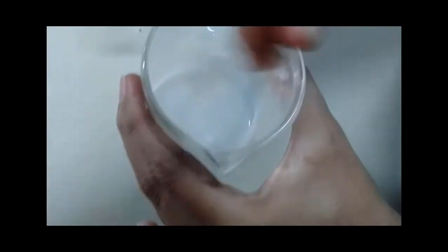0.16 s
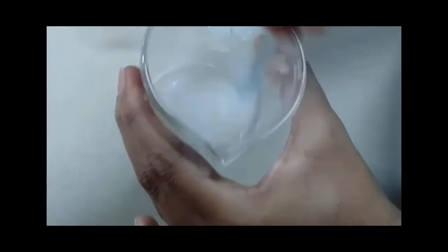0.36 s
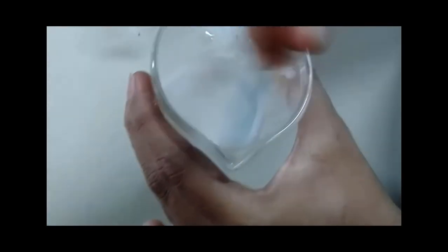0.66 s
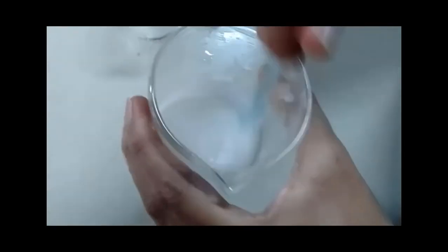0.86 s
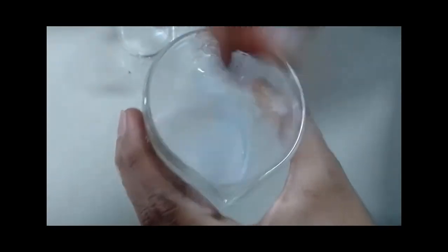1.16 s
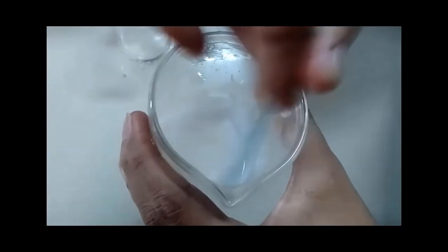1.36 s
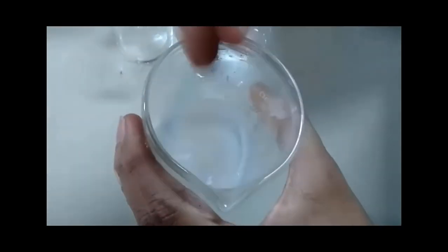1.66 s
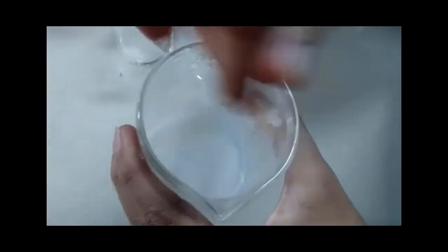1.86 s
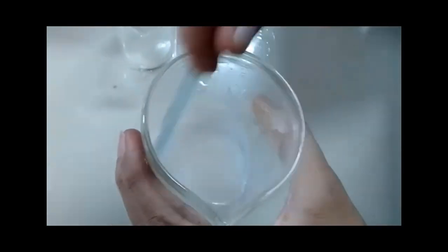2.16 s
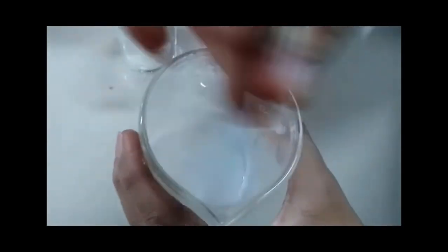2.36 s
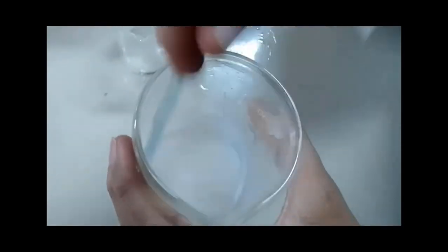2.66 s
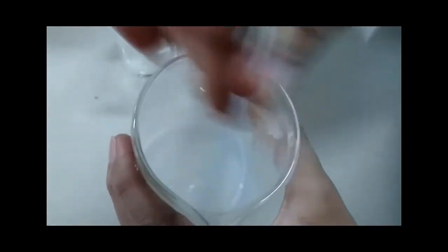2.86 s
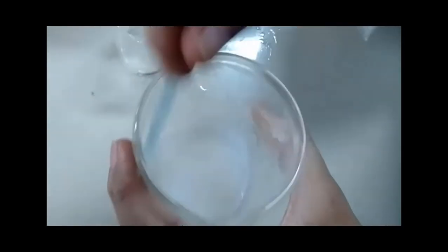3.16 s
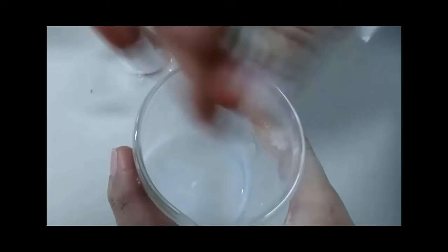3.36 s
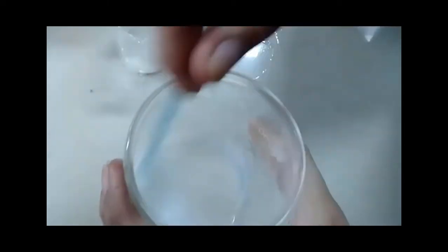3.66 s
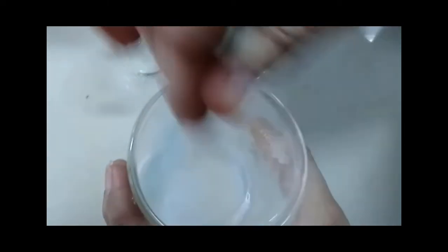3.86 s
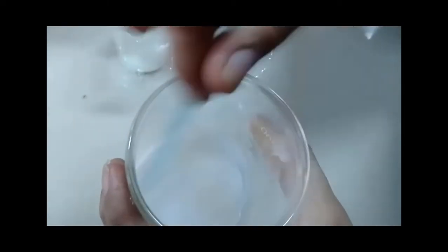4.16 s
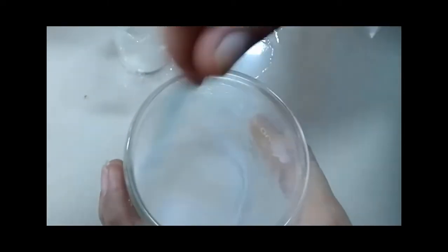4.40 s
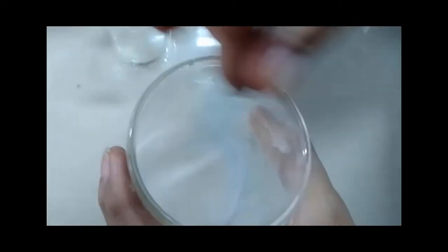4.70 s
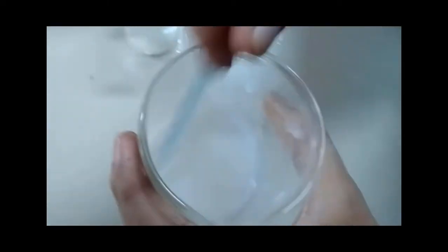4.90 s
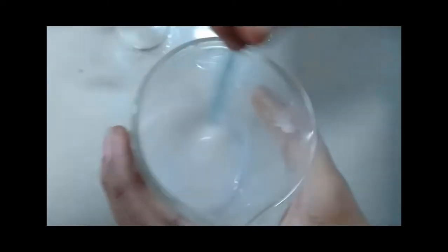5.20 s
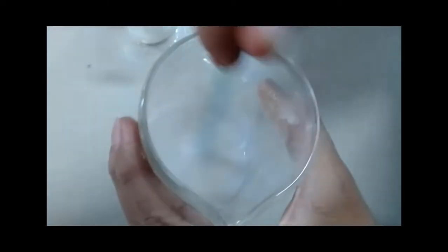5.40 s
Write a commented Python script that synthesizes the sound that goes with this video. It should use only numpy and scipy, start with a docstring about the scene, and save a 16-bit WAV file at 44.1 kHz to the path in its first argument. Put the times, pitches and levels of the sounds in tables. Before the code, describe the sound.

Someone stirs a creamy liquid hard with a glass rod in a hand-held glass beaker, heard very close in stereo. From 0 s the rod slides loudly on the wall and begins clinking, then strikes continuously, irregularly, roughly fifteen to twenty times a second. Each clink is a short chattery tick with a mid-high glassy tone, bright rod rattle and sometimes a hollow cup-like knock; liquid and hand stop it ringing. Harder hits stand out near 0.7, 1.2, 1.55, 2.85, 3.6, 3.85 and 4.3 s. Between hits there is a wet gritty hiss and scraping, with tiny squeaky rubs around 1.5, 1.7, 3.4, 4.6 and 5.2 to 5.4 s. Clusters of glancing taps alternate with fuller knocks. Soft low bumps come through the hand, clearest at 0.7 s. After about 5.2 s hits thin out into rubbing. The room is quiet, with faint hum and very short reflections.

```python
"""A glass rod is whipped round a hand-held glass beaker of creamy liquid, close to a two-port microphone.
Each blow is a chattering contact force that excites the decaying modes of cavity, wall, rim, base and rod.
Between blows the tip slides: tiny slips excite the glass under a friction hiss, and longer rubs squeak.
Jolts reach the microphone through the hand as low pushes; the room hums faintly as shaped noise."""
import sys
import numpy as np
from scipy import signal
from scipy.io import wavfile
from scipy.ndimage import uniform_filter1d

SR = 44100
rng = np.random.default_rng(int(sys.argv[2]) if len(sys.argv) > 2 else 0)


def generate_wav(sig):
    """Save sig (samples, or channels by samples) to the path in sys.argv[1] as 16-bit PCM at SR."""
    pcm = np.round(np.clip(np.atleast_2d(sig).T, -1, 1) * 32767).astype(np.int16)
    wavfile.write(sys.argv[1], SR, pcm)


N = 244314  # samples


def gain_of(db):
    """Level definition: decibels to amplitude ratio."""
    return 10 ** (np.asarray(db) / 20)


def summed_db(*db):
    """Energy addition: the level of several incoherent sounds together."""
    return 10 * np.log10(np.sum(gain_of(db) ** 2))


def evened(x):
    """Normalization to an rms of 1."""
    return x / np.sqrt(np.mean(x ** 2) + 1e-20)


def read(points, hz):
    """Linear interpolation of a table on a log-frequency axis."""
    f, value = np.transpose(points)
    return np.interp(np.log(hz + 1), np.log(f + 1), value)


def add(mix, s, sound):
    """Superposition: adds a stereo sound to the mix at time s."""
    part = mix[:, round(s * SR):][:, :sound.shape[1]]
    part += sound[:, :part.shape[1]]


def wavering(step_s, depth_db):
    """Random modulation: a gain that drifts from step to step."""
    levels = np.interp(np.arange(N) / SR / step_s, np.arange(2000), rng.standard_normal(2000))
    return gain_of(depth_db * levels)


# Phase between the ports: pitch_hz, left_lead_rad
PORT_LEAD = [(0, 0), (860, 0.71), (2500, 6.5), (5170, 8), (7150, -1.5), (8700, -16), (10800, -18.5),
             (15100, -32.5)]
# Balance between the ports: pitch_hz, left_minus_right_db
PORT_BALANCE = [(60, 9), (150, 1), (380, 10), (940, -14.5), (2370, 0.5), (5930, -3), (14900, 11.5)]


def ports(hz, scatter):
    """Level and phase differences: complex gains of two ports, with an extra left lead (rad)."""
    half = gain_of(read(PORT_BALANCE, hz) / 2) * np.exp(.5j * (read(PORT_LEAD, hz) + scatter))
    return np.array([half, 1 / half])


# Likeness of the noise at the two ports: pitch_hz, correlation (no unit, limited to 0..1 when read)
PORT_LIKENESS = [(60, -0.0014), (180, 0.78), (540, 0.038), (1640, 0.97), (4930, 0.35), (14900, -1.4)]


def wash(spectrum, size, patchy_db):
    """Partially coherent noise: random spectra, shaped and patchy, overlap-added at an rms of 1."""
    hz = np.fft.rfftfreq(size, 1 / SR)
    frames = N * 4 // size + 5
    a, b, c, d, patches = rng.standard_normal((frames, len(hz), 5)).T
    patches = uniform_filter1d(patches, size=6, axis=0)  # across frequency
    patches = evened(uniform_filter1d(patches, size=8, axis=1))  # across time
    same = np.clip(read(PORT_LIKENESS, hz), 0, 1)[:, None]
    left = a + 1j * b
    right = same * left + np.sqrt(1 - same ** 2) * (c + 1j * d)
    spectra = np.array([left, right]) * ports(hz, 0)[..., None]
    spectra *= gain_of(read(spectrum, hz)[:, None] + patchy_db * patches)
    return evened(signal.istft(spectra, nperseg=size, noverlap=size * 3 // 4)[1][:, :N])


# Relative spectrum of the room hum: pitch_hz, density_db (per Hz)
ROOM_SPECTRUM = [(15, -55), (25, -27), (228, -8.5), (393, -12.5), (676, -21), (800, -18), (1210, -35),
                 (1760, 0), (1970, -13.5), (2200, -21.5), (2860, -47), (4840, -120)]


def room():
    """Stationary background: faint shaped noise, stronger at the left port."""
    level_db = -54.5 + np.array([[4.0], [-4.0]])
    return gain_of(level_db) * wash(ROOM_SPECTRUM, size=1024, patchy_db=3.0)


# Jolts through the hand: start_s, level_db (relative)
JOLTS = [(0.207, -43), (0.715, -27.5), (0.927, -40), (1.169, -38.5), (1.437, -43.5), (1.89, -49),
         (2.107, -40), (2.255, -42), (2.596, -38), (3.117, -40.5), (4.05, -43), (4.24, -51), (4.324, -42),
         (4.832, -44), (5.056, -43.5)]


def thud(s, db):
    """Structure-borne impulse: a low push and rebound that reaches mostly the left port."""
    x = np.arange(2000) / SR / .0016
    push = x * (1 - x / 2.7) * np.exp(-x)
    return s - .002, gain_of(db + 18.5) * push * gain_of([[0.5], [-17.0]])


def bench(x):
    """Diffuse reflection: convolves with dense decaying echoes from bench and walls, different at each port."""
    t = np.arange(6000) / SR
    tail = rng.standard_normal((2, len(t))) * gain_of(-60 * t / 0.17) * (t > .002)
    return signal.oaconvolve(x, tail / np.linalg.norm(tail[0]), axes=1)[:, :N]


# Modes of the beaker in four groups (air cavity, wall, rim, base): pitch_hz (nominal), level_db (relative), t60_s
GLASS = [
    [(805, -6.5, 0.054), (872, 3, 0.019)],
    [(2400, -13.5, 0.032), (2500, 5.5, 0.033), (2620, -1, 0.014)],
    [(3351, -4.5, 0.04), (3505, -4, 0.078)],
    [(3910, -2, 0.0093), (4034, -3.5, 0.021), (4425, 3, 0.017), (4535, -7.5, 0.016)],
]
# Modes of the hand-damped rod: pitch_hz (nominal), level_db (relative), t60_s
ROD = [(5300, -10, .007), (6100, -8, .006), (6800, -4, .009), (7420, -2, .012), (8300, -5, .006),
       (9380, -2, .012), (10200, -1, .007), (11000, -2, .006), (12000, -4, .005), (13000, -6, .005),
       (13850, -4, .006)]


def modes():
    """Modal decomposition: columns of Hz, dB, t60 and the part (0 cavity, 1 wall, 2 rim, 3 base, 4 rod)."""
    parts = GLASS + [ROD]
    return *np.concatenate(parts).T, np.repeat(np.arange(len(parts)), [len(rows) for rows in parts])


DRAG_S = 0.036  # time constant


def drag(column):
    """Exponential relaxation: an envelope that each blow raises by the level in a column of BLOWS."""
    kicks = np.zeros(N)
    kicks[[round(row[0] * SR) for row in BLOWS]] = gain_of([row[column] for row in BLOWS])
    return signal.lfilter([1], [1, -np.exp(-1 / (DRAG_S * SR))], kicks)


# How well skidding rings wall, rim and base: level_db
SKID_DB = [-7.5, 1.5, -3]
# The sloshing liquid loads the wall unevenly, zone by zone: pitch_ratio
ZONE_TUNING = [0.92, 1, 1.1]
ZONE_S, ZONE_DB = .035, 6  # how fast and how far each zone and part comes and goes


def skids():
    """Random excitation of resonators: dense tiny slips ring now one wall zone, now another, rim or base."""
    hz, db, t60, part = modes()
    t, out = np.arange(4096) / SR, np.zeros((2, N))
    for k, tuning in [(1, ratio) for ratio in ZONE_TUNING] + [(2, 0.98), (3, 1)]:
        here = part == k
        f = hz[here] * tuning
        rings = np.exp(np.outer(2j * np.pi * f - np.log(1000) / t60[here], t))
        rings *= 1 - np.exp(-t / 0.00051)  # soft onset
        gains = gain_of(db[here] + SKID_DB[k - 1]) * ports(f, 2.3 * rng.standard_normal(len(f)))
        body = (gains @ rings).real
        slips = gain_of(1.5 * rng.exponential(1, N)) * rng.standard_normal(N)
        slips = wavering(ZONE_S, ZONE_DB) * slips
        out += signal.oaconvolve(slips[None], body, axes=1)[:, :N]
    return evened(out)


# Steady part of the sliding: start_s, wall_db (tip pressure on the wall), hiss_db (friction)
SLIDE = [(0.0, -32, -32), (0.29, -45, -47), (0.48, -38, -38), (1.45, -42, -39), (1.56, -34.5, -37.5),
         (2.11, -46, -42.5), (2.19, -42, -41.5), (2.75, -45, -40.5), (2.82, -54, -39), (3.05, -46, -39),
         (3.69, -35, -38), (4.07, -46.5, -39), (4.3, -43.5, -38.5), (4.47, -40.5, -37), (4.64, -39, -41.5),
         (5.0, -42.5, -40.5), (5.43, -36.5, -42.5), (5.54, -43.5, -43.5)]
# Relative spectrum of wet friction: pitch_hz, density_db (per Hz)
HISS_SPECTRUM = [(900, -48), (1300, -22.5), (1760, -6), (2200, -19), (3000, 1.5), (4500, 10.5), (5000, 2),
                 (6300, 1), (7300, 9), (9600, 3), (11200, 2.5), (12400, -11), (13900, -1.5), (14600, -54)]
DRAG_WALL_DB, DRAG_HISS_DB = -22.5, -26  # drag after a blow, relative to its wall and rod levels
GRIP_S, GRIP_DB = .03, 4  # the grip of the tip wavers


def slide():
    """Sliding friction: slips ring the beaker over a smooth wet hiss, both swelling after blows."""
    s, wall_db, hiss_db = np.transpose(SLIDE)
    clock = np.arange(N) / SR
    hiss = wash(HISS_SPECTRUM, size=256, patchy_db=1.5)
    wall = gain_of(np.interp(clock, s, wall_db)) + gain_of(DRAG_WALL_DB) * drag(column=3)
    rough = gain_of(np.interp(clock, s, hiss_db)) + gain_of(DRAG_HISS_DB) * drag(column=1)
    return wall * skids() + rough * wavering(GRIP_S, GRIP_DB) * hiss


# Squeaks of the tip (levels relative): start_s, wall_db, wall_pitch_hz, cavity_db, cavity_pitch_hz, length_s
RUBS = [(0.0044, -17, 2500, -36.5, 852, 0.027), (1.512, -23, 2500, -20, 827, 0.025),
        (1.708, -7.5, 2440, -23, 870, 0.018), (3.3812, -10.5, 2390, -68, 896, 0.023),
        (4.598, -16.5, 2440, -37, 787, 0.03), (5.1888, -10, 2586, -34, 805, 0.0177),
        (5.322, -24, 2620, -29, 805, 0.03), (5.365, -18.5, 2456, -21.5, 794, 0.038),
        (5.438, -27.5, 2320, -74, 826, 0.039)]


def rub(row, luck):
    """Stick-slip: irregular slips keep wall, air cavity and base ringing roughly for a moment."""
    s, wall_db, wall_hz, cavity_db, cavity_hz, length = row
    slips = luck[:round(length * SR)]
    slips = slips * signal.windows.tukey(len(slips), .15)
    voices = ((wall_hz, wall_db - 3.0, .022),  # Hz, dB, t60 s
              (cavity_hz, cavity_db - 10.0, .05),
              (GLASS[3][1][0], wall_db - 9.5, .015))  # the base sings along
    t, sound = np.arange(3000) / SR, 0
    for hz, db, t60 in voices:
        mode = np.exp((2j * np.pi * hz - np.log(1000) / t60) * t) * (1 - np.exp(-t / 0.0014))
        ring = signal.fftconvolve(slips, mode)
        sound = sound + gain_of(db) * (ports(np.array([hz]), 0) * ring / abs(ring).max()).real
    return s, sound


# Blows (levels relative): start_s, rod_db, cavity_db, wall_db, rim_db, wall_pitch_hz (before scatter)
# a square blow sounds the cavity, a glancing one hardly
BLOWS = [(0.11,-17,-33,-23,-42,2680),(0.1231,-8.5,-21.5,-22.5,-29,2500),(0.2112,-8.5,-70,-36,-21.5,2500),(.2513,-10,-70,-44,-39,2500),(0.3192,-12.5,-70,-37,-25,2660),(0.3576,-13,-60,-29.5,-50,2720),(0.3778,-18,-33,-29,-26,2610),(.4426,-9.5,-70,-27,-23.5,2860),(0.4902,-12.5,-45,-26,-29,2460),(0.519,-23.5,-26,-16,-43,2500),(0.6163,-9.5,-21.5,-23.5,-25,2585),(0.715,-3.5,-31,-24.5,-14.5,2620),(.756,-19,-70,-28,-33,2640),(0.855,-12,-22,-27,-20,2500),(0.926,-9,-66,-16,-34,2714),(0.9872,-17.5,-49,-25,-40,2400),
         (0.9962,-21,-60,-17.5,-45,2560),(1.0136,-18,-21,-11.5,-43,2474),(1.07,-17,-40,-25,-45,2720),(1.1008,-14,-17.5,-11.5,-27,2500),(1.1683,-5,-66,-25.5,-40,2800),(1.2241,-16.5,-68,-27,-53,2760),(1.235,-21,-70,-29,-49,2650),(1.3271,-9,-25.5,-33,-48,2590),(1.3367,-9.5,-23.5,-31,-28,2500),(1.414,-45,-56,-26.5,-40,2730),(1.4375,-5,-65,-27,-16.5,2740),(1.467,-10.5,-67,-38,-30,2560),(1.4738,-11.5,-60,-47,-42,2750),(1.4794,-29,-64,-52,-48,2730),(1.4867,-24,-60,-40,-43,2740),(1.5103,-17.5,-14.5,-15,-15,2480),(1.5531,-5.5,-30.5,-18.5,-16,3005),(1.651,-8.5,-48,-27,-24,2620),(1.7061,-22,-33,-16.5,-48,2455),(1.809,-9,-34,-30.5,-39,2480),(1.8865,-7.5,-35.5,-22,-37,2620),(1.932,-13.5,-70,-33.5,-42,2680),
         (2.008,-9.5,-70,-34,-25.5,2620),(2.0634,-16,-31,-29,-23.5,2620),(2.108,-6.5,-60,-24.5,-30,2830),(2.161,-12.5,-90,-25,-51,2524),(2.2563,-7.5,-42,-25.5,-40,2590),(2.271,-20.5,-70,-41,-43,2580),(2.285,-12,-19.5,-19.5,-19,2550),(2.367,-6,-70,-33,-16,2500),(2.4019,-12.5,-70,-57,-35,2500),(2.493,-11.5,-61,-40,-25,2410),(2.513,-13.5,-42,-39,-44,2640),(2.5297,-13.5,-19.5,-28,-23,2560),(2.598,-7.5,-53,-26.5,-27.5,2500),(2.6436,-10,-68,-50,-35,2440),(2.7269,-9.5,-58,-45,-30.5,2500),(2.7578,-15.5,-39,-33.5,-45,2500),(2.7823,-7.5,-23,-30,-20.5,2460),(2.8504,-3.5,-64,-32,-23,2860),(2.8876,-12.5,-67,-26,-28,2500),
         (3.029,-15.5,-47,-50,-30,2540),(3.04,-9.5,-20.5,-26,-25,2555),(3.117,-7,-67,-24.5,-33,2390),(3.132,-25,-70,-40,-37,2500),(3.1623,-12,-59,-33,-43,2390),(3.247,-10,-70,-33,-28,2500),(3.264,-17,-60,-32,-42,2600),(3.2712,-14,-25.5,-28,-25,2630),(3.3425,-17,-45,-51,-28,2500),(3.387,-12,-68,-13.5,-42,2417),(3.4883,-10.5,-85,-39,-37,2460),(3.5214,-9,-21.5,-24.5,-22,2490),(3.5881,-4,-43,-32,-36,2490),(3.6339,-15.5,-36,-21,-30,2500),(3.6514,-12.5,-18.5,-8,-17,2426),(3.75,-9.5,-32,-36,-32,2550),(3.7564,-13.5,-23.5,-22,-34,2500),(3.8476,-2.5,-34,-31.5,-18,2400),
         (4.003,-8.5,-22.5,-27,-22,2430),(4.0512,-9,-70,-29,-36,2640),(4.1126,-15.5,-70,-30,-30,2500),(4.2413,-9,-23,-20,-25,2525),(4.295,-33,-70,-33,-32,2600),(4.3246,-3,-41,-29.5,-21,2470),(4.368,-17,-70,-22,-34,2420),(4.433,-9.5,-85,-40,-27,2420),(4.4859,-13,-47,-38,-45,2620),(4.5031,-8,-21,-29,-22,2460),(4.562,-6,-56,-24,-28,2750),(4.596,-17,-57,-32,-26,2380),(4.6178,-24,-31,-23,-28,2580),(4.7338,-10,-15.5,-18.5,-26,2620),(4.8375,-5.5,-70,-32,-17,2540),(4.8665,-16,-70,-24.5,-52,2690),(4.8781,-11.5,-88,-56,-51,2660),(4.886,-29,-70,-45,-46,2550),(4.9784,-19,-46,-38,-53,2340),(4.9867,-19,-31,-28,-36,2620),
         (5.0601,-7,-70,-21,-27,2740),(5.1077,-16.5,-70,-28.5,-47,2520),(5.118,-17,-70,-43,-50,2470),(5.1936,-22.5,-28,-19,-29.5,2490),(5.3171,-8.5,-42,-21.5,-26,2640),(5.3776,-25.5,-31,-20,-48,2500)]
# Parts (cavity, wall, rim, base, rod): radiation_db, left_minus_right_db, pitch_scatter (ratio),
# contact_share (ratio), port_phase_scatter_rad
PARTS = [(-7.5, 7, 0.02, 1.88, 0.32), (3.5, -3.5, 0.011, 1.22, 1.64), (7, 4.5, 0.0048, 0.74, 0.8),
         (3.5, 3.5, 0.032, 0.71, 0.78), (5, -0.5, 0.036, 0.57, 2.26)]
# Scatter of the mode shares with the landing spot, per part: level_db
SPOT_DB = [3, 2, 2, 3, 3]
# the base rings with the rod, the wall, and most under square blows
BASE_FROM_ROD_DB, BASE_FROM_WALL_DB, BASE_FROM_CAVITY_DB = -10.5, -9, 9
# contact time at a rod level of 0 dB, its growth with rod level, and its random log spread
CONTACT_MS, CONTACT_MS_PER_DB, CONTACT_SCATTER = 1.91, 0.09, 0.33
KNOCK_DB, KNOCK_SLOPE = 26.5, 5.77  # broad knock, mostly on hard blows; slope in dB per dB
GLANCE_DB, RIM_TILT_DB = -45.5, 2  # below this cavity level a blow glances and favours the upper rim mode


def blow(row, luck):
    """Modal excitation by impact: a chattering contact rings every mode; the landing spot sets its share."""
    s, rod_db, cavity_db, wall_db, rim_db, wall_hz = row
    base_db = summed_db(BASE_FROM_ROD_DB + rod_db, BASE_FROM_WALL_DB + wall_db,
                        BASE_FROM_CAVITY_DB + cavity_db)
    part_db = np.array([cavity_db, wall_db, rim_db, base_db, rod_db])
    contact_ms = (CONTACT_MS + CONTACT_MS_PER_DB * rod_db) * np.exp(CONTACT_SCATTER * luck[79])
    hz, db, t60, part = modes()
    gain_db, pan_db, scatter, brief, spread = np.transpose(PARTS)[:, part]
    upper = np.sign(hz - hz[part == 2].mean())
    db = db + RIM_TILT_DB * (part == 2) * upper * (cavity_db < GLANCE_DB)
    tune, spot, side = luck[:3 * len(hz)].reshape(3, -1)
    hz = np.where(part == 1, hz * wall_hz / GLASS[1][1][0], hz)  # the liquid loads the wall
    hz = hz * (1 + scatter * tune)

    t = np.arange(3072) / SR
    turn = np.exp(2j * np.pi * np.outer(hz, t))
    u = np.outer(1000 / np.clip(contact_ms * brief, .2, 9), t[:1000])  # time in contact times
    chatter = luck[-1000:] * u * np.exp(-u ** 2)
    at_mode = abs((chatter / turn[:, :1000]).sum(1, keepdims=True))  # force spectrum at each mode
    chatter /= at_mode + 0.21 * np.linalg.norm(chatter, axis=1, keepdims=True)
    rings = turn * np.exp(-np.outer(np.log(1000) / t60, t)) * (1 - np.exp(-t / 0.00093))
    rings = np.fft.ifft(np.fft.fft(rings) * np.fft.fft(chatter, len(t)))
    share_db = db + gain_db + part_db[part] + np.array(SPOT_DB)[part] * spot
    share = gain_of(share_db + np.outer([.5, -.5], pan_db))
    sound = ((share * ports(hz, spread * side)) @ rings).real

    t, u = t[:899], u[:, :899]
    crack = u[-1] * np.exp(-u[-1] ** 2)  # broad crack of glass on glass
    bounces = gain_of(5.8 * np.interp(t, np.arange(20) / 1000, luck[80:100]))  # ragged micro-contacts
    rattle = gain_of(-6.0) * bounces * (1 - np.exp(-t / 0.0024)) * np.exp(-(t / 0.0066) ** 2)
    snap = np.diff(luck[100:1900].reshape(2, 900), axis=1) * (crack + rattle)
    sound[:, :899] += gain_of(rod_db - 6.5) * (snap + 0.16 * snap[::-1])  # some crosses over
    knock = np.diff(uniform_filter1d(luck[1000:1900], size=12), n=1)
    knock = knock * u[1] * np.exp(-(u[1] * 2) ** 2)
    sound[:, :899] += gain_of(KNOCK_DB + KNOCK_SLOPE * rod_db) * knock
    return s - .0006, sound


def scene():
    """Superposition of blows and squeaks with their reflections, sliding, the room and jolts."""
    clinks = np.zeros((2, N))
    for row, luck in zip(BLOWS, rng.standard_normal((len(BLOWS), 2900))):
        add(clinks, *blow(row, luck))
    for row, luck in zip(RUBS, rng.standard_normal((len(RUBS), 4000))):
        add(clinks, *rub(row, luck))
    mix = clinks + gain_of(-13.5) * bench(clinks) + slide()
    mix += room()
    for row in JOLTS:
        add(mix, *thud(*row))
    return mix


LOW_CUT_HZ, TREBLE_CUT_HZ, EDGE_HZ = 79, 14100, 15470  # low cut, steep treble cut, band limit


def record(dry):
    """Saturation and filtering: soft clipping, a low cut, a steep treble cut and a band limit."""
    treble = signal.firwin2(255, [0, TREBLE_CUT_HZ, TREBLE_CUT_HZ + 500, SR / 2], [1, 1, .015, .002], fs=SR)
    edge = signal.firwin(511, EDGE_HZ, window=("kaiser", 9), fs=SR)
    clipped = np.tanh(dry)  # bends mainly the loudest clinks
    cut = signal.lfilter(*signal.butter(1, LOW_CUT_HZ, "high", fs=SR), clipped)
    return signal.oaconvolve(cut, np.convolve(treble, edge)[None], "same")


dry = scene()
out = record(dry)
generate_wav(out)
```